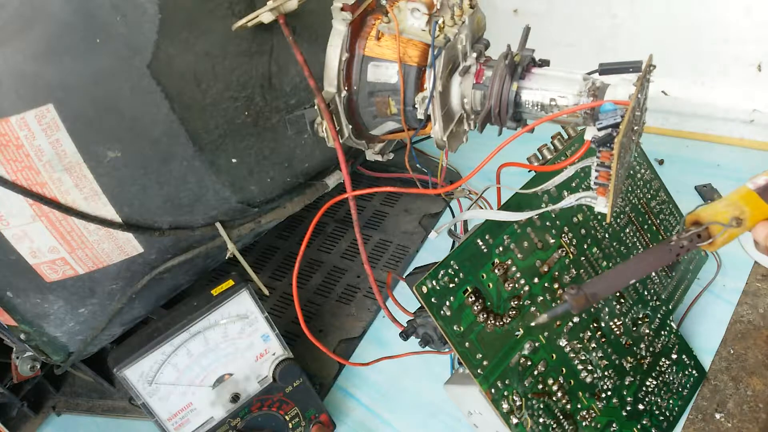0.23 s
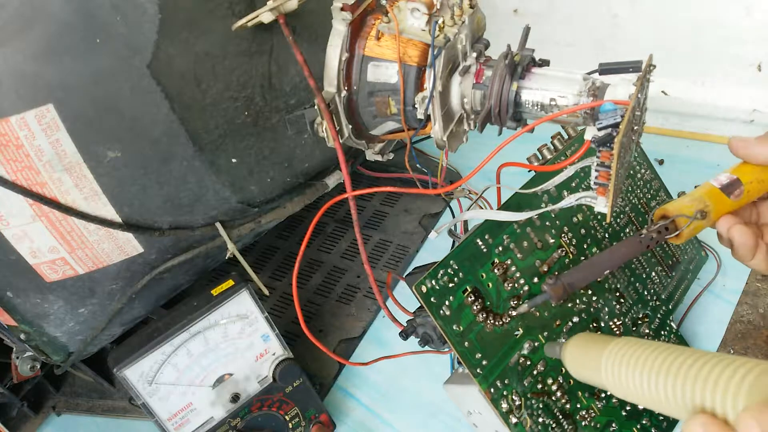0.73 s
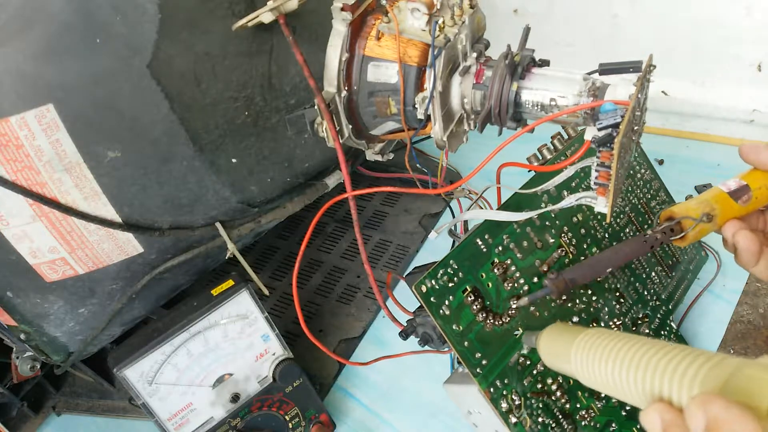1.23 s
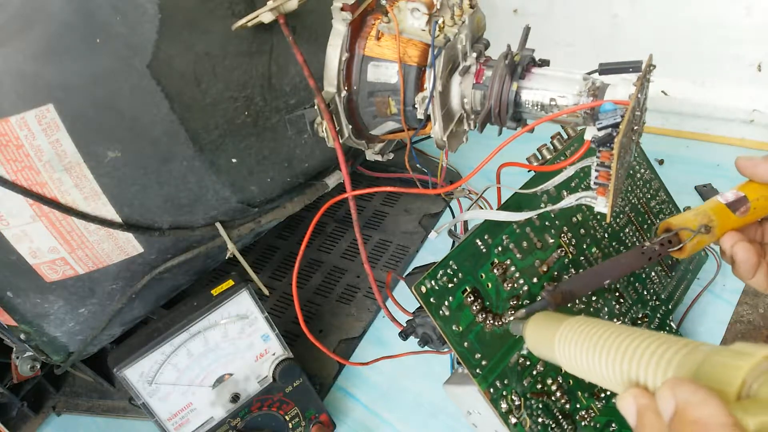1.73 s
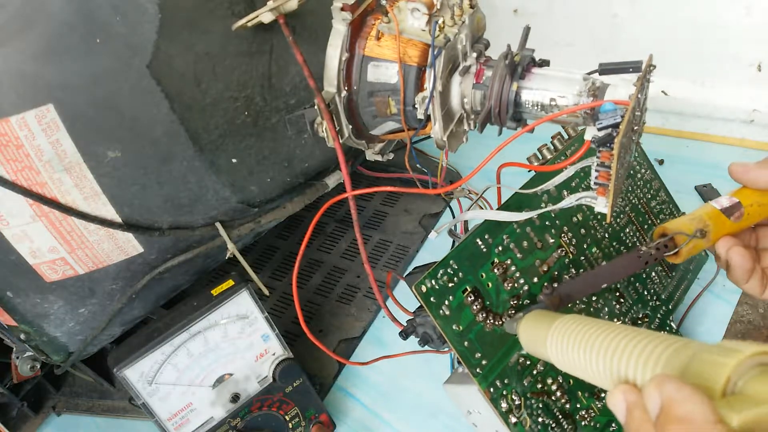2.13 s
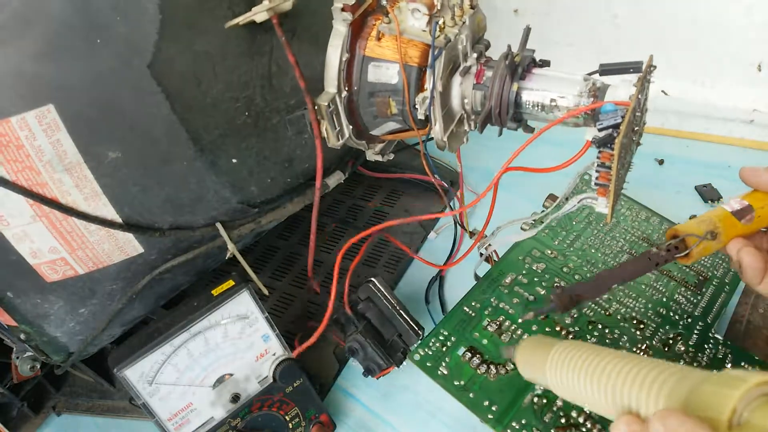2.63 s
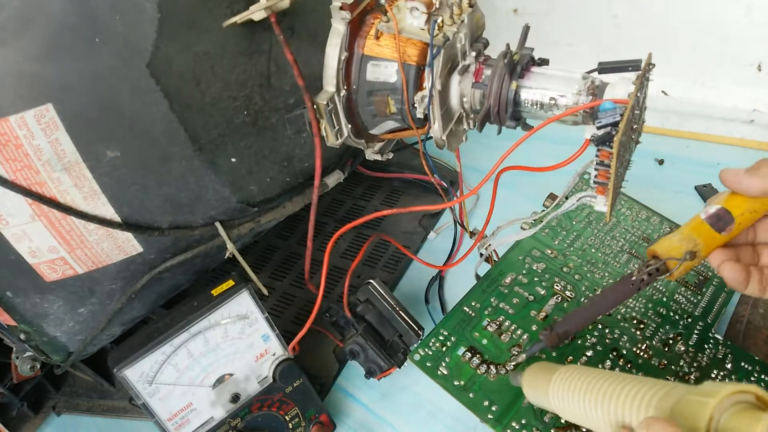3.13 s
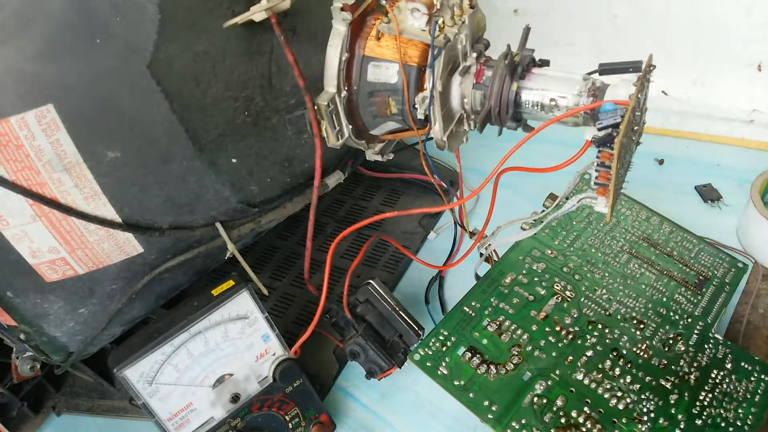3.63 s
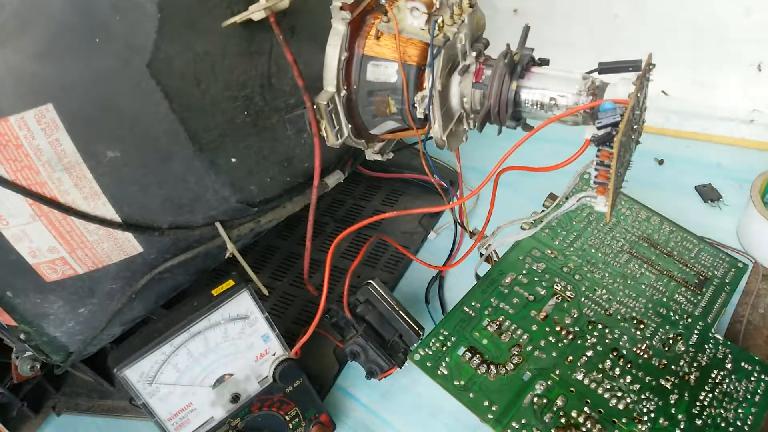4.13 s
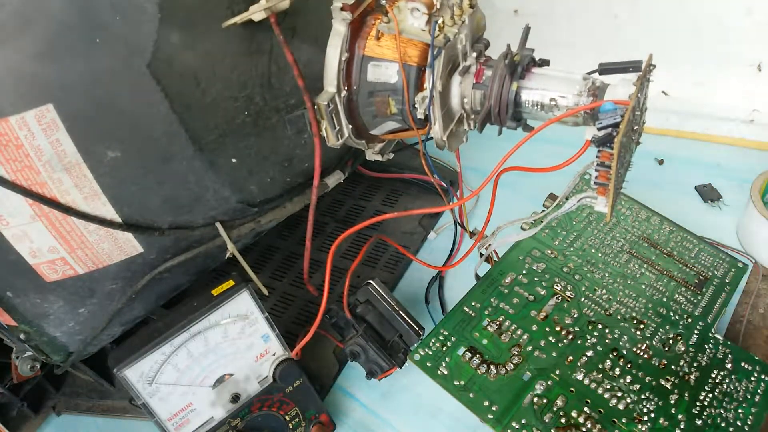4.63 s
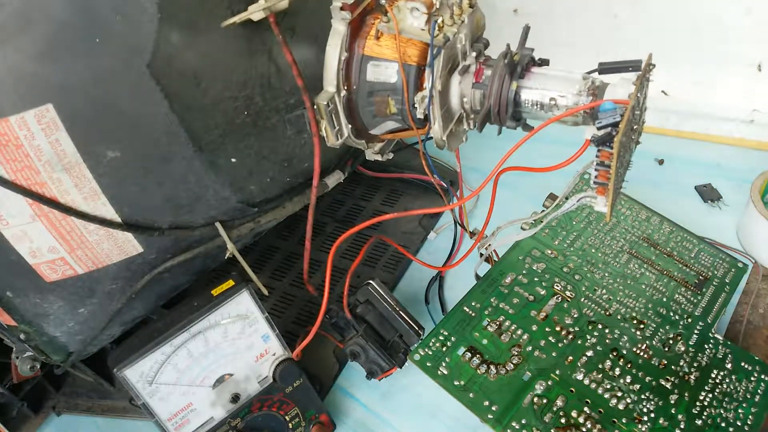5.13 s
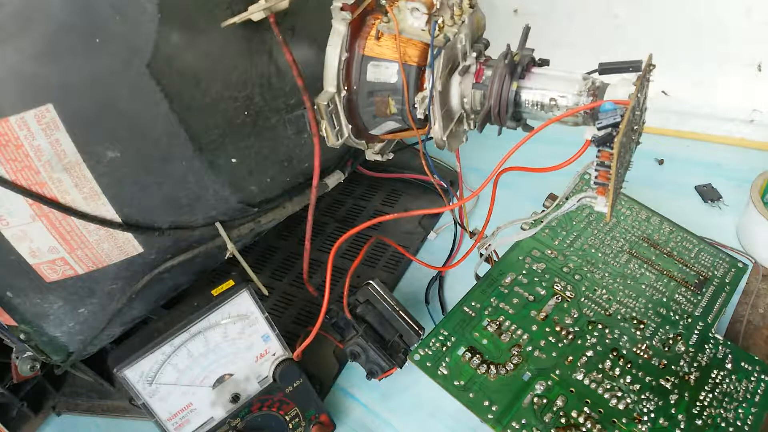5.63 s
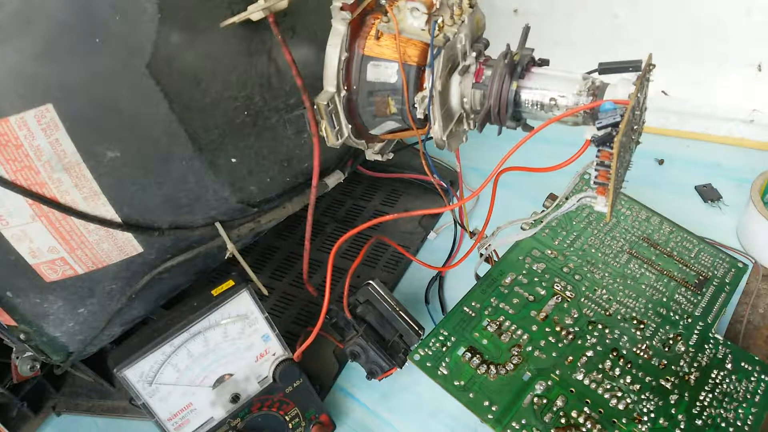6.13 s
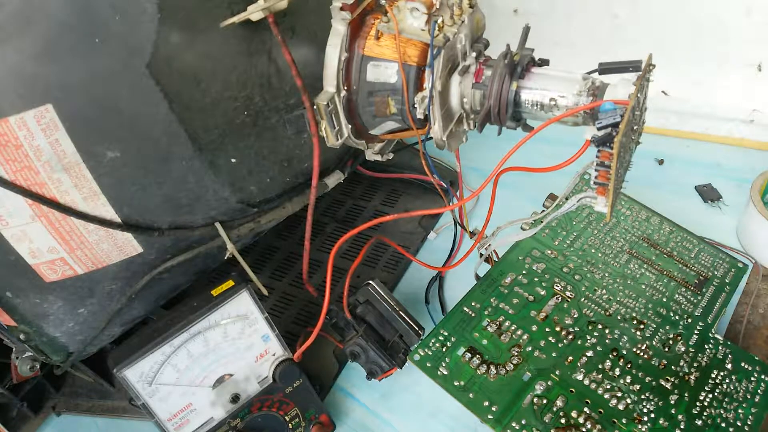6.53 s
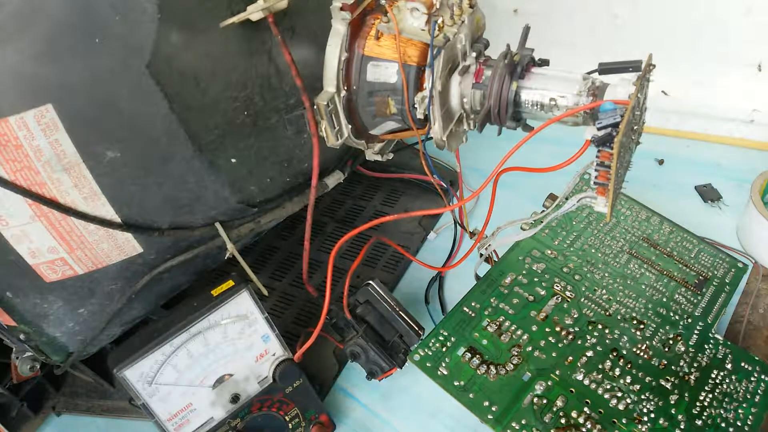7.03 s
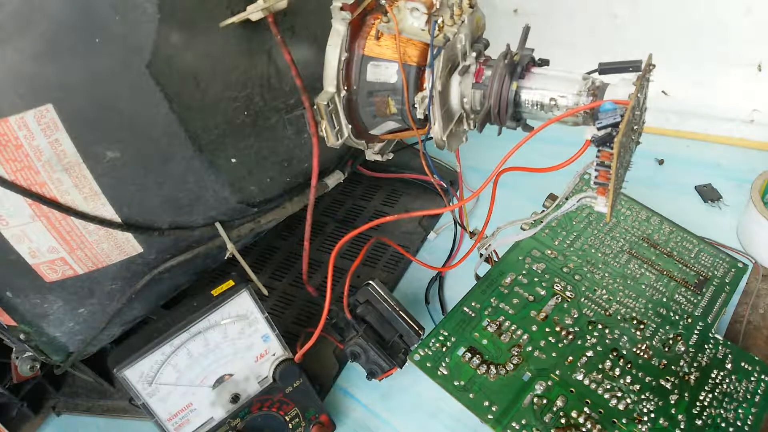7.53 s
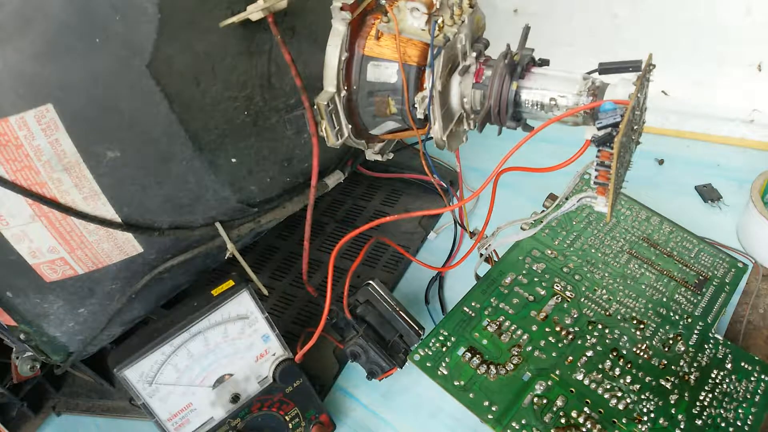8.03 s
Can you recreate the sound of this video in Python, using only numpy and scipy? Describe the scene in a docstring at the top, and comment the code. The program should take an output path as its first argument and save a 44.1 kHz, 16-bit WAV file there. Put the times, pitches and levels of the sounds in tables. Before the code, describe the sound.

A small, mildly echoing workshop with low rumble, soft air movement and faint hissy wash. From 0 to 0.7 s, thin, soft rubbing strokes and tiny ticks; a distant double knock at 0.7. Light clicks at 1.3, a short rough metal squeak at 1.5, then farther knocks around 1.75 and hollow rubs from 2.0. At 2.4 a sharp pump click; the board scrapes and judders louder and slams down at 2.58, a hard clipped crack with a woody clack and deep thud, rattling until 2.72. Taps follow at 3.1-3.3. A deep distant motor drone swells to about 4.1 and fades, with bright then dull rubbing. Small ringing clicks at 4.85-4.9, coarse rasps at 5.3-5.7, remote knocks at 6.2 and 6.5. The drone returns faintly near 7.2; a plastic double snap at 7.38-7.47 rings briefly, a faint knock follows at 7.8, and soft rubbing ends it at 8.3.

```python
"""Desoldering at the repair bench

The desoldering pump clicks, the circuit board slips and bangs down, and later the pump snaps again.
Tools tick and rasp, a metal part squeaks, things are knocked about farther off, and a distant motor drones.
Contacts are decaying noise shaped by resonances; the squeak, pings and motor are built on sine tones.
Two spaced microphones of opposite polarity pick it up and overload on the bang."""
import sys
import numpy as np
from scipy import signal
from scipy.fft import rfft, irfft, next_fast_len
from scipy.io import wavfile
from scipy.ndimage import uniform_filter1d, map_coordinates

SR = 44100
rng = np.random.default_rng(int(sys.argv[2]) if len(sys.argv) > 2 else 0)


def to_wav(s):
    """Save 16-bit WAV."""
    ch = np.atleast_2d(s).T  # columns
    pcm = np.round(np.clip(ch, -1, 1) * 32767)  # PCM
    wavfile.write(sys.argv[1], SR, pcm.astype(np.int16))


N = 366030
TIME = np.arange(N) / SR

# blows that shake the bench: start_s, crack_db, clack_db, thud_db, t60_s (of the crack)
BLOWS = [(2.522, -41.5, -29.5, -25.5, 0.11), (2.5816, -19, -13, 1.5, 0.094), (2.5849, 1.5, -1, 1, 0.042),
         (2.6, -11.5, -7.5, -6, 0.059), (2.6185, -19, -12.5, -7, 0.075), (2.631, -27.5, -16, -11, 0.075),
         (2.655, -25.5, -12.5, -11.5, 0.065), (2.6772, -18.5, -11, -1.5, 0.042),
         (2.685, -19.5, -13.5, -5, 0.055), (2.7204, -29, -26, -7.5, 0.062),
         (4.449, -42.5, -58.5, -46.5, 0.062), (4.921, -28, -31, -26, 0.28),
         (6.885, -71.5, -64.5, -34, 0.041), (7.3827, -13, -29, -18.5, 0.087),
         (7.399, -14, -28.5, -19.5, 0.32), (7.4749, -24, -23, -25.5, 0.31), (7.825, -52, -61, -32.5, 0.28)]
# spectrum of cracking plastic: frequency_hz, level_db
CRACK_SPECTRUM = [(300, 0), (1200, -1), (2400, -1), (3100, 1.5), (4000, 3.5), (5200, -0.5), (7000, -9.5),
                  (15000, -7.5)]
# circuit board resonances: frequency_hz, width_hz, level_db
BOARD_MODES = [(478, 59, 0.5), (575, 54, 2.5), (724, 23, 2), (980, 130, -9), (1210, 39, -4.5),
               (1710, 78, -9), (2240, 120, -12)]
# bench resonances: frequency_hz, width_hz, level_db
BENCH_MODES = [(45, 26, -10), (82.7, 20, 6.5), (115, 24, -2), (197, 22, -2.5), (228, 28, -5.5),
               (300, 26, -7.5), (334, 24, -7), (443, 72, -10)]


def blows(room_db=-12, thud_life=1.91, clack_life=1.47, modes_db=5):
    """A crack of plastic, the board's clack and the slower thud of the bench, each dying exponentially."""
    out, t = np.zeros((2, N)), TIME[:SR // 2]
    plastic = crowded(colour(CRACK_SPECTRUM), modes_db, spacing_hz=70.5)
    board = body(BOARD_MODES)
    bench = lambda hz: body(BENCH_MODES)(hz) / np.hypot(1, (hz / 700) ** 2)  # soft above 700 Hz
    for start_s, crack_db, clack_db, thud_db, t60_s in BLOWS:
        crack = field(plastic, size=len(t)) * amp(crack_db - 60 * t / t60_s)
        clack = field(board, size=len(t)) * amp(clack_db - 60 * t / (t60_s * clack_life))
        thud = field(bench, size=len(t)) * amp(thud_db - 60 * t / (t60_s * thud_life))
        thud = thud * (1 - np.exp(-t / 0.00033))
        add(out, start_s, crack + clack + thud)
    return out + amp(room_db) * room(out)


SLIP_START_S, SLIP_END_S = 2.406, 2.585  # the board lets go, and lands
SLIP_DB, SLIP_GROWS_DB_PER_S, SLIP_ATTACK_S = -41.5, 49, 0.025  # it scrapes louder as it gathers speed


def slip(judder_db=10.5):
    """The board scrapes and judders the bench modes, ever louder, as it slides off its rest."""
    scrape = field(crowded(colour(CRACK_SPECTRUM), depth_db=-3.5, spacing_hz=147.0))
    scrape = scrape * catches(rate_hz=230, life_s=0.0014, share=0.6)
    judder = amp(judder_db) * field(body(BENCH_MODES))
    t = np.clip(TIME - SLIP_START_S, 0, SLIP_END_S - SLIP_START_S)
    growth = (1 - np.exp(-t / SLIP_ATTACK_S)) * amp(SLIP_DB + SLIP_GROWS_DB_PER_S * t)
    return (TIME < SLIP_END_S) * growth * (scrape + judder)


# woody contacts of the board as it slips and lands, and of the tools on it: start_s, level_db
TAPS = [(2.4938, -24), (2.509, -26.5), (2.556, -23.5), (2.585, 0), (2.604, -14.5), (2.685, -20),
        (2.7192, -27.5), (3.121, -29.5), (3.285, -35), (3.309, -29), (4.469, -51), (4.655, -53)]
# resonances of those contacts: frequency_hz, width_hz, level_db
TAP_MODES = [(1520, 165.5, 3), (1920, 270, 2.2), (2280, 160, 3.6), (2756, 250, 1)]


def taps(t60_s=0.051, attack_s=0.0021, room_db=-10):
    """Dry, woody taps on the board: short noise through a few broad resonances."""
    out, t = np.zeros((2, N)), TIME[:SR // 4]
    for start_s, level_db in TAPS:
        envelope = amp(level_db - 60 * t / t60_s) * (1 - np.exp(-t / attack_s))
        add(out, start_s, field(body(TAP_MODES), size=len(t)) * envelope)
    return out + amp(room_db) * room(out)


# small hard contacts of pump, iron and board, before the trims in ticks():
# start_s, level_db, knock_db (relative to the click), t60_s (of the click), room_db
TICKS = [(0.135, -51, -8, 0.055, -15), (0.529, -39, 1, 0.061, -26), (1.281, -38.5, -18, 0.1, -7),
         (1.307, -36, -3.5, 0.091, -4.5), (2.4005, -9.5, -34, 0.029, -13.5),
         (2.4605, -19.5, -11, 0.029, -8), (2.494, -13, -1, 0.037, -9), (2.547, -14, -13, 0.031, -11),
         (3.119, -22.5, -5, 0.043, -9), (3.281, -30, -3, 0.1, -3.5), (3.308, -26, 2, 0.06, -6.5),
         (4.405, -47.5, 13, 0.064, -2), (4.508, -42.5, -8, 0.11, 1.5), (4.841, -27, -4, 0.036, -8),
         (4.869, -32.5, 2.5, 0.08, 3.5), (4.905, -25, -4, 0.062, 4), (5.444, -34.5, 12, 0.06, 6),
         (5.635, -38.5, 17.5, 0.044, -4), (5.669, -35.5, 7, 0.095, -7)]
# spectrum of the click: frequency_hz, level_db
TICK_SPECTRUM = [(300, -62.5), (1500, -7), (2800, -7), (3900, 0.5), (4700, -1), (5400, -3), (7000, -15),
                 (15000, -12.5)]


def ticks(trim_db=-6, knock_trim_db=-3, knock_life=1.76, modes_db=6, attack_s=0.0043):
    """Short bright clicks, each with a little knock of the board; the farther ones start more softly."""
    dry, sent, t = np.zeros((2, N)), np.zeros((2, N)), TIME[:SR // 4]
    for start_s, level_db, knock_db, t60_s, room_db in TICKS:
        hard = crowded(colour(TICK_SPECTRUM), modes_db, spacing_hz=177.2)
        click = field(hard, size=len(t)) * amp(-60 * t / t60_s)
        knock = field(body(BOARD_MODES), size=len(t))
        knock = knock * amp(knock_db + knock_trim_db - 60 * t / (t60_s * knock_life))
        onset = 1 - np.exp(-t / (attack_s * amp(room_db)))  # more room means farther, so softer
        sound = amp(level_db + trim_db) * (click + knock) * onset
        add(dry, start_s, sound)
        add(sent, start_s, sound * amp(room_db))
    return dry + room(sent)


# rubbing strokes, levels before the trims in rasps(): peak_s, rise_s, t60_s, body_db, grit_db, surface
RASPS = [(.03, 0.08, 0.94, -59, -54, "thin"), (0.149, 0.019, 0.68, -58.5, -72, "soft"),
         (0.245, 0.014, 0.42, -51.5, -59, "thin"), (0.39, 0.034, 0.33, -56, -65, "thin"),
         (0.435, 0.018, 0.4, -53.5, -66, "thin"), (0.496, 0.012, 0.98, -53.5, -64, "thin"),
         (0.701, 0.04, 0.37, -51, -77, "soft"), (2.02, 0.029, 0.15, -50, -66, "hollow"),
         (2.12, 0.035, 0.48, -52.5, -53, "hollow"), (2.23, 0.026, 0.21, -49.5, -78, "hollow"),
         (3.691, 0.036, 0.72, -64, -61, "bright"), (3.95, 0.084, 0.52, -45.5, -50.5, "bright"),
         (4.11, 0.029, 0.56, -79, -52, "bright"), (4.455, 0.021, 1.04, -46.5, -56, "dull"),
         (4.62, 0.043, 0.28, -49.5, -52, "dull"), (5.297, 0.013, 0.84, -42.5, -45.5, "coarse"),
         (5.365, .03, 0.53, -33, -63, "coarse"), (5.415, .018, 0.4, -32, -64, "coarse"),
         (5.447, .018, 0.75, -33, -56, "coarse"), (5.66, 0.073, 0.36, -47, -49.5, "coarse"),
         (7.03, 0.086, 0.55, -49, -57, "soft"), (8.27, 0.093, 0.8, -55, -55, "soft")]
# the broad hump of each surface's rubbing noise, by surface: frequency_hz, width_hz
RUB_HUMPS = {"thin": (1970, 2100), "hollow": (2400, 1200), "bright": (3430, 5000), "dull": (1400, 2900),
             "coarse": (1200, 2140), "soft": (1900, 3200)}
# the resonances that rubbing excites, by surface: frequency_hz, width_hz, level_db
RASP_PEAKS = {"thin": [(730, 420, -2), (1410, 54, -13), (2740, 41, 1.5), (3060, 82, 0)],
              "hollow": [(716, 55, 12.5), (1207, 84, 12), (1883, 44, -9)], "bright": [(1240, 48, 0.5),
              (2320, 62, -1), (2780, 98, 1)], "dull": [(465, 110, -3), (930, 35, 15.5), (1140, 47, 11.5),
              (1600, 140, -1)], "coarse": [(762, 81, 6), (1215, 40, 4), (1265, 99, 7), (1540, 23, 4),
              (1730, 35, -1), (2090, 110, -6), (2450, 49, 1), (2820, 39, -3), (3230, 70, -6.5),
              (5080, 180, -8.5)], "soft": [(900, 114, 3), (1400, 75, 10.5), (2380, 135, -1)]}
# spectrum of rubbing grit: frequency_hz, level_db
GRIT_SPECTRUM = [(1000, -16), (2500, -17.5), (3900, 4.5), (4750, 2.5), (5250, 3), (5800, 3), (15000, -3)]


def rasps(body_trim_db=3, grit_trim_db=2.5, grip_db=0.54, resonance_db=1, modes_db=5):
    """Strokes swell and die; surfaces catch and let go many times a second and excite their resonances."""
    out, t = np.zeros((2, N)), TIME[:SR]
    for peak_s, rise_s, t60_s, body_db, grit_db, name in RASPS:
        start_s = max(peak_s - 2 * rise_s, 0)
        since_peak = start_s + t - peak_s
        swell, decay = np.exp(-(since_peak / rise_s) ** 2), amp(-60 * abs(since_peak) / t60_s)
        stroke = np.where(since_peak < 0, swell, decay)
        hump, peaks = body([(*RUB_HUMPS[name], 0)]), body(RASP_PEAKS[name])
        surface = lambda hz: np.hypot(hump(hz) ** 3, amp(resonance_db) * peaks(hz))
        rub = field(crowded(surface, modes_db, spacing_hz=49.3), size=SR)
        grit = field(crowded(colour(GRIT_SPECTRUM), modes_db, spacing_hz=120.8), size=SR)
        rubbing = amp(body_db + body_trim_db) * rub + amp(grit_db + grit_trim_db) * grit
        add(out, start_s, stroke * rubbing)
    return out * catches() * amp(grip_db * wobble(30))


SQUEAK_START_S, SQUEAK_END_S, SQUEAK_DAMPED_S = 1.478, 1.583, 1.727  # dragged, let go, and stopped
# partials of the metal part: pitch_hz, level_db, t60_s, roughness (0 to 1)
SQUEAK_PARTIALS = [(692, -42, 2.4, 0.1), (777, -43, 0.35, 0.3), (896, -43.5, 0.28, 0.4),
                   (1790, -55, 0.3, 0.4), (2218, -51, 0.37, 0.7), (2460, -50, 2.6, 0.1),
                   (3130, -60, 0.4, 0.8), (3994, -48.5, 0.42, 0.65), (4940, -51.5, 0.26, 0.5),
                   (5905, -51, 0.32, 0.2)]


def squeak(rise_s=0.012, damped_t60_s=0.2, jitter=0.012, scrape_db=7.0):
    """A metal part squeaks as it is dragged, then rings freely until the next knock damps it."""
    out, t = np.zeros((2, N)), TIME[:SR]
    free, damped = (np.maximum(SQUEAK_START_S + t - s, 0) for s in (SQUEAK_END_S, SQUEAK_DAMPED_S))
    friction = amp(-60 * free / 0.3)  # it shakes the partials, and dies away after release
    for pitch_hz, level_db, t60_s, roughness in SQUEAK_PARTIALS:
        shake, grip = (wobble(rate, size=SR) * friction * roughness for rate in (150, 70))
        turns = np.cumsum(pitch_hz * (1 + jitter * shake)) / SR + arrival()
        loss_db = 60 * (free / t60_s + damped / damped_t60_s)
        level = amp(level_db + scrape_db * grip - loss_db) * (1 - np.exp(-t / rise_s))
        add(out, SQUEAK_START_S, level * np.sin(2 * np.pi * turns))
    return out


# parts that ring on after a touch: start_s, pitch_hz, level_db, t60_s
PINGS = [(1.279, 4280, -50, 0.32), (1.547, 4190, -46, 0.13), (1.579, 3880, -42, 0.076),
         (1.581, 4830, -46, 0.06), (1.607, 4070, -46, 0.08), (2.401, 4000, -15.5, 0.03),
         (2.496, 4200, -23, 0.062), (2.93, 440, -47.5, 1), (3.14, 464.7, -42, 0.74),
         (4.841, 4870, -32, 0.12), (4.868, 4850, -36, 0.08), (4.841, 3820, -41, 0.11),
         (4.847, 1960, -36.5, 0.13), (4.905, 4940, -30, 0.12), (4.922, 4935, -30.5, 0.28),
         (5.41, 2024, -38, 0.88), (5.47, 2120, -41, 0.46), (6.921, 1356, -44, 0.28),
         (7.474, 514, -21.5, 0.15), (7.478, 1120, -25, 0.23), (7.385, 776, -32.5, 1),
         (7.385, 117.5, -22, 0.23), (7.826, 235, -37.5, 0.17)]


def pings(flutter=0.85, width_hz=10, treble_widening=0.016):
    """Single modes; the room's echoes make them flutter, the high ones faster."""
    out, t = np.zeros((2, N)), TIME[:SR]
    for start_s, pitch_hz, level_db, t60_s in PINGS:
        # narrow-band noise stands for the echoes
        echoes = field(body([(pitch_hz, width_hz + treble_widening * pitch_hz, 0)]), size=SR)
        tone = np.sin(2 * np.pi * (pitch_hz * t + arrival())) + flutter * echoes
        add(out, start_s, tone * amp(level_db - 60 * t / t60_s) * (1 - np.exp(-t / 0.0023)))
    return out


# knocks across the room, before the trim in knocks(): start_s, clack_db, crack_db, ring_db, rise_s, t60_s
KNOCKS = [(0.711, -42.5, -50, -39, 0.0048, 0.59), (0.728, -53, -37, -41.5, 0.006, 0.26),
          (1.464, -62, -47, -34.5, 0.024, 0.63), (1.739, -38, -33, -32, 0.018, 0.47),
          (1.780, -32, -33, -29.5, 0.014, 0.5), (4.588, -51, -63, -39, 0.025, 0.53),
          (4.755, -51.5, -76, -39, 0.017, 1), (6.234, -38.5, -45, -29, 0.013, 0.68),
          (6.511, -36.5, -34.5, -29, 0.015, 0.52)]
# what each of those objects rings with, one list per knock: pitch_hz, level_db
KNOCK_RINGS = [
    [(580, 9), (684, 13), (760, 0), (890, -12), (1406, -1), (1676, -4)],
    [(2750, 0), (3580, -3), (3775, 3), (3994, 5), (5400, -14)],
    [(743, 7.5), (791, -2), (899, 5), (1066, 0.5), (1222, -4.5), (1814, -11)],
    [(690, -5), (2900, -11.5), (4950, -17.5), (5950, -11)],
    [(500, 9), (555, 4), (607, 4.5), (1170, -7), (1700, -6), (2100, -6)],
    [(463, 9), (894, -7), (1098, 3), (2234, -14.5), (5200, -12.5)],
    [(587, 5), (673, -2), (899, -7), (2105, -16)],
    [(581, 3.5), (754, -2), (883, 5.5), (1170, 2.5), (1250, 2), (2230, -3.5), (3180, -7), (3950, -13)],
    [(953, -1.5), (1175, -0.5), (2130, -20), (2236, 2.5), (3190, -9), (3990, -9), (4780, -9), (5000, -4),
     (5930, -8.5)],
]
RING_WIDENING = 0.008  # higher modes are broader by this share of their frequency


def knocks(ring_width_hz=24, trim_db=2, modes_db=5, ring_loss_db_per_s=20):
    """Far knocks arrive as reverberant noise: they swell, then fade with their object's modes."""
    out, t = np.zeros((2, N)), TIME[:SR]
    for (start_s, clack_db, crack_db, ring_db, rise_s, t60_s), ring_modes in zip(KNOCKS, KNOCK_RINGS):
        modes = [(hz, ring_width_hz + RING_WIDENING * hz, db) for hz, db in ring_modes]
        ring = amp(ring_db - ring_loss_db_per_s * t) * field(body(modes), size=SR)
        board = crowded(body(BOARD_MODES), modes_db, spacing_hz=45.4)
        clack = amp(clack_db) * field(board, size=SR)
        plastic = crowded(colour(CRACK_SPECTRUM), modes_db, spacing_hz=80.3)
        crack = amp(crack_db) * field(plastic, size=SR)
        fade = amp(trim_db - 60 * np.maximum(t - 2 * rise_s, 0) / t60_s)
        add(out, start_s, (ring + clack + crack) * (1 - np.exp(-t / rise_s)) * fade)
    return out


MOTOR_HZ, MOTOR_CLIMB_HZ_PER_S = 54.5, 0.82  # mean pitch at the start, and how it creeps up
# swells of the distant motor: peak_s, level_db, rise_s, fall_s
MOTOR_SWELLS = [(4.1, -20.5, 1.42, 0.6), (7.2, -33.5, 0.92, 1.3)]


def motor(waver_db=4.0, third_db=-28, jitter_hz=1.81):
    """A deep drone swells twice as its speed creeps up unevenly; its long waves reach both mics alike."""
    hz = MOTOR_HZ + MOTOR_CLIMB_HZ_PER_S * TIME + jitter_hz * wobble(29)
    phase = 2 * np.pi * np.cumsum(hz) / SR
    drone = np.sin(phase) + amp(third_db) * np.sin(3 * phase)
    return np.sqrt(2) * swells(MOTOR_SWELLS) * amp(waver_db * wobble(21)) * drone


WASH_DB, HISS_DB, RUMBLE_DB = -53, -58, -35  # the steady background
HISS_SWELL_DB = -18.5  # the hiss that comes with each swell of the wash, relative to it
RUMBLE_FOLLOWS = 0.34  # share of the deepest rumble's rise and fall that the whole rumble takes on
# swells of the distant midrange wash: peak_s, level_db, rise_s, fall_s, hump_hz
WASH_SWELLS = [(2.3, -45.5, 0.57, 1.37, 650), (4.95, -41.5, 0.64, 0.89, 570),
               (5.75, -45.5, 0.36, 0.68, 890), (7.298, -42.5, 1.27, 1.14, 800)]
# level of the deepest rumble: time_s, level_db
RUMBLE_DEPTH = [(0.0, -64), (2.84, -55.5), (3.21, -53), (4.57, -54), (5.25, -63), (7.47, -62.5),
                (8.3, -66.5)]
# air moving over the microphones: time_s, level_db (relative to the rumble)
DRAUGHT = [(0, -7.5), (2.0, -13.5), (4.7, -14), (5.1, -27), (6.3, -25), (6.7, -13), (8.3, -15.5)]
# spectra of rumble, midrange wash and hiss: frequency_hz, level_db
RUMBLE_SPECTRUM = [(10, -1.5), (30, 5.5), (65, -6), (95, -1.5), (125, -10.5), (190, -12.5), (280, -21.5),
                   (600, -32.5), (2000, -66.5)]
WASH_SPECTRUM = [(120, -24.5), (230, 9), (290, 0.5), (380, 0.5), (560, -1), (720, 0), (870, 0.5),
                 (1080, -7.5), (1600, -8), (2300, -19.5), (4000, -24.5), (9000, -51.5)]
HISS_SPECTRUM = [(800, -15.5), (2200, 9), (3200, -3), (4600, 4), (6000, -3), (15000, 0)]


def ambience(hiss_drift_db=-2.0, hump_db=3, hump_width_hz=200):
    """Noise beds: a low rumble, a hissy midrange wash that comes and goes, a draught on each microphone."""
    (depth_db,), (draught_db,) = curves(RUMBLE_DEPTH), curves(DRAUGHT)
    rumble_db = RUMBLE_DB + RUMBLE_FOLLOWS * (depth_db - depth_db.mean()) + 1.5 * wobble(3.9)
    air = colour([(15, 0.5), (45, -9.5), (110, -20.5), (400, -57.0)])
    # the wide spacing makes the draught nearly unrelated at the two microphones
    draught = amp(draught_db + 2.4 * wobble(3.6)) * field(air, spacing_m=17.0)
    low = amp(rumble_db) * (field(colour(RUMBLE_SPECTRUM)) + draught)

    murk = colour(WASH_SPECTRUM)
    wash = amp(WASH_DB) * patchy(field(murk), depth_db=3.5)
    for *shape, hump_hz in WASH_SWELLS:
        hump = body([(hump_hz, hump_width_hz, hump_db)])
        humped = lambda hz: murk(hz) * np.hypot(1, hump(hz))
        wash = wash + swells([shape]) * patchy(field(humped), depth_db=3.5)

    passing = swells([row[:4] for row in WASH_SWELLS])
    hiss_level = np.hypot(amp(HISS_DB), amp(HISS_SWELL_DB) * passing) * amp(hiss_drift_db * wobble(2.87))
    hiss = hiss_level * patchy(field(colour(HISS_SPECTRUM)), depth_db=3.5)
    return low + wash * amp(wobble(6.8)) + hiss


# how long the room rings at each frequency: frequency_hz, t60_s
ROOM_DECAY = [(60, 0.92), (300, 0.47), (1200, 0.43), (5000, 0.38), (9000, 0.2), (15000, 0.37)]


def room(x):
    """The room's answer: diffuse noise in which each frequency dies at its own speed."""
    hz, t, z = signal.stft(field(np.ones_like, size=SR), SR, nperseg=256)
    decay = amp(-60 * t / along(ROOM_DECAY, hz)[:, None])
    tail = signal.istft(z * decay, SR, nperseg=256)[1]
    return signal.fftconvolve(x, tail / np.linalg.norm(tail[0]), axes=1)[:, :N]


def field(response, size=N, spacing_m=0.15):
    """Diffuse noise of rms 1 at two spaced microphones: alike in the bass only."""
    m = next_fast_len(size)
    hz = np.fft.rfftfreq(m, 1 / SR)
    alike = .99 * np.sinc(2 * hz * spacing_m / 343)  # 343 m/s, the speed of sound
    spectra = rfft(rng.standard_normal((2, m))) * response(hz)
    common, apart = irfft(spectra * np.sqrt([1 + alike, 1 - alike]), m)[:, :size]
    return unit(np.array([common + apart, common - apart]))


def arrival():
    """A random starting phase in turns; the tone reaches the two microphones a quarter turn apart."""
    return rng.random() + np.array([[0], [.25]])


def catches(rate_hz=110, life_s=0.0039, share=0.48):
    """Gain of a rubbing surface: random little slips, each dying in milliseconds, over a steady part."""
    little_slips = (rng.random(N) < rate_hz / SR) * rng.exponential(size=N)
    power = signal.lfilter([1], [1, -np.exp(-1 / (life_s * SR))], little_slips)
    share = np.clip(share, 0, 1)
    return np.sqrt(1 - share + share * power / power.mean())


def body(modes):
    """The response of resonances given as frequency_hz, width_hz, level_db."""
    def response(f):
        peaks = (amp(db) * f * w / (c * c - f * f + 1j * f * w) for c, w, db in modes)
        return np.sqrt(sum(abs(peak) ** 2 for peak in peaks))
    return response


def crowded(response, depth_db, spacing_hz):
    """A response broken up by an object's many small, irregular modes."""
    knots = rng.standard_normal(int(SR / spacing_hz) + 4)
    ripple = lambda hz: np.tanh(map_coordinates(knots, [hz / spacing_hz]))
    return lambda hz: response(hz) * amp(depth_db * ripple(hz))


def patchy(x, depth_db):
    """Narrow bands swell and fade on their own, as distant sounds do."""
    z = signal.stft(x, nperseg=2048)[2]
    gains = uniform_filter1d(rng.standard_normal(z.shape[1:]), size=4, axis=0)  # smooth over frequency
    gains = uniform_filter1d(gains, size=7, axis=1)  # and over time
    return unit(signal.istft(z * amp(depth_db * unit(gains)), nperseg=2048)[1][:, :N])


def swells(rows):
    """Gain over time: bell-shaped swells, each with its own rise and fall."""
    bell = lambda s, rise, fall: np.exp(-((TIME - s) / np.where(TIME < s, rise, fall)) ** 2)
    return sum(amp(db) * bell(s, rise, fall) for s, db, rise, fall in rows)


def wobble(rate, size=N):
    """A smooth random curve, rate knots a second."""
    return map_coordinates(rng.standard_normal(int(size * rate / SR) + 4), [TIME[:size] * rate])


def curves(rows):
    """One value per sample for each column after the time."""
    s, *cols = np.transpose(rows)
    return [np.interp(TIME, s, c) for c in cols]


def along(points, hz):
    """Interpolate (frequency_hz, value) points on a log frequency axis."""
    f, v = np.transpose(points)
    return np.interp(np.log(hz + 1), np.log(f + 1), v)


def colour(points):
    """The response of a spectrum given as frequency_hz, level_db."""
    return lambda hz: amp(along(points, hz))


def amp(db):
    """Decibels to gain."""
    return 10 ** (np.asarray(db) / 20)


def unit(x):
    """Scale to rms 1."""
    return x / np.sqrt(np.mean(x ** 2) + 1e-20)


def add(track, start_s, sound):
    """Mix a sound in at its start time, cut off at the end of the track."""
    part = track[:, round(start_s * SR):][:, :sound.shape[1]]
    part += sound[:, :part.shape[1]]


def filtered(x, response):
    """Filter x by a response of frequency."""
    m = next_fast_len(N + SR // 2)
    return irfft(rfft(x, m) * response(np.fft.rfftfreq(m, 1 / SR)), m)[..., :N]


def scene():
    """Everything at the two microphones, from the bang to the background."""
    board = blows() + slip() + taps()
    tools = ticks() + rasps() + squeak() + pings()
    return board + tools + knocks() + motor() + ambience()


# the microphones' treble response: frequency_hz, level_db
MIC_RESPONSE = [(5500, 0), (6400, -7), (7000, -33.5), (8200, -16), (11000, -23.5), (15000, -37.5)]
TOP_HZ = 15400


def record(dry, left_db=1, right_db=-1):
    """Dull microphones, the right one inverted, clipping hard at full scale and then band-limited."""
    gains = np.array([[amp(left_db)], [-amp(right_db)]])
    wired = filtered(dry, colour(MIC_RESPONSE)) * gains
    return filtered(np.clip(wired, -1, 1), lambda hz: hz < TOP_HZ)


dry = scene()
out = record(dry)
to_wav(out)
```